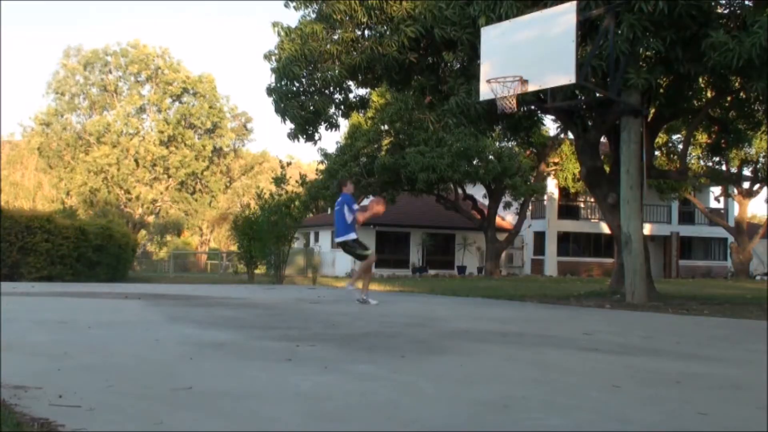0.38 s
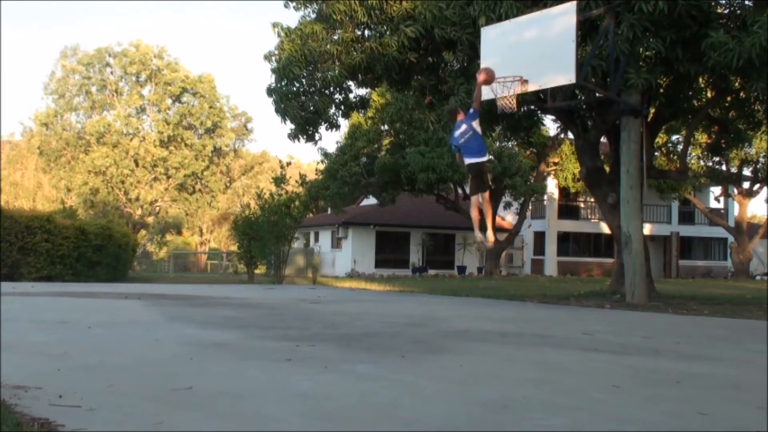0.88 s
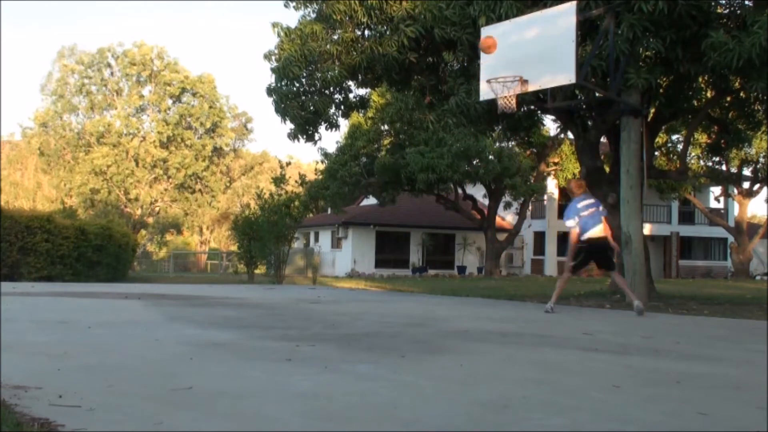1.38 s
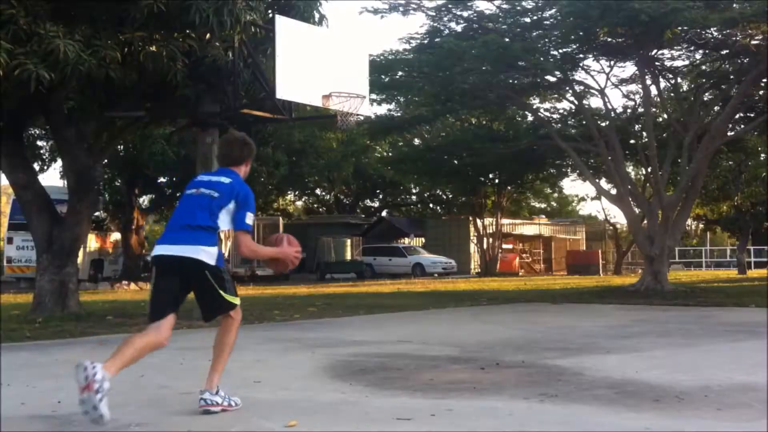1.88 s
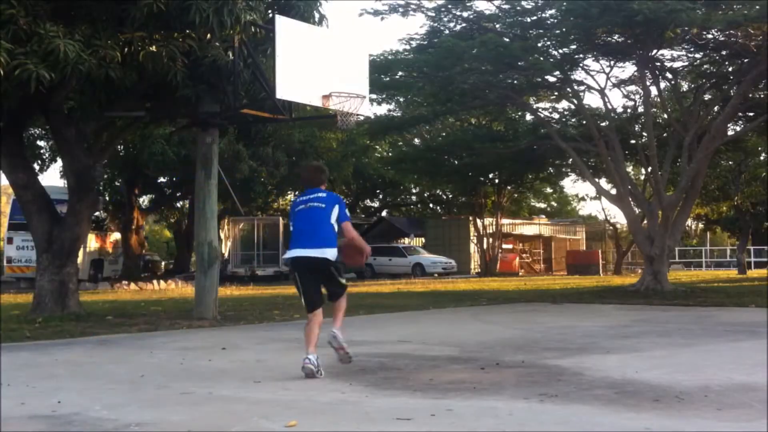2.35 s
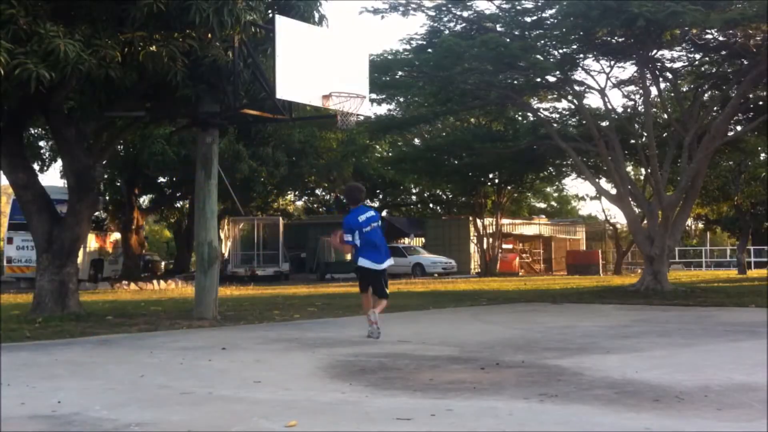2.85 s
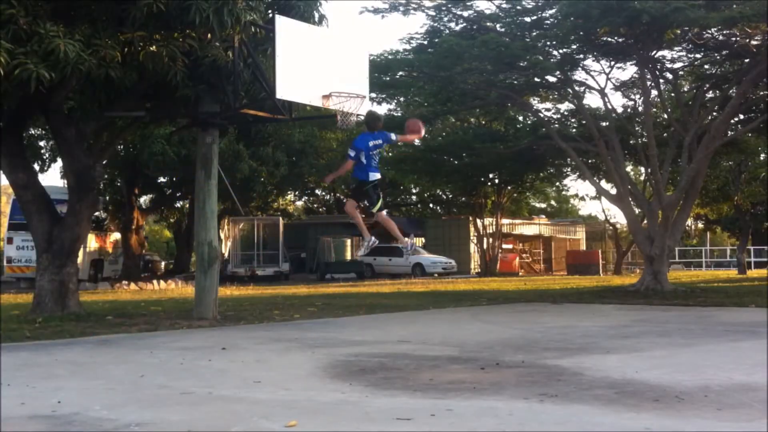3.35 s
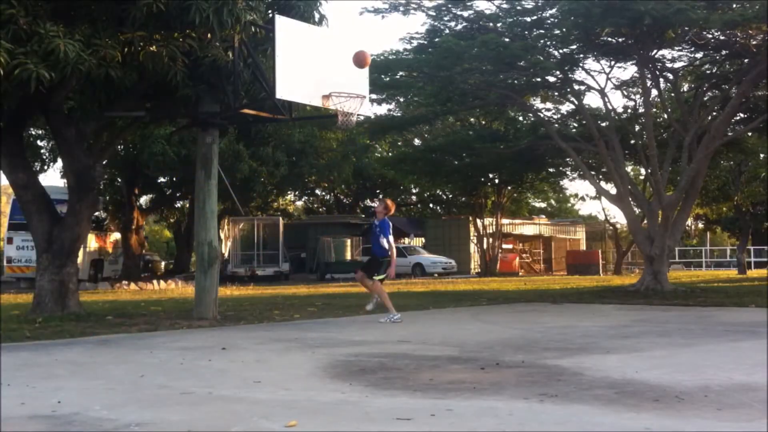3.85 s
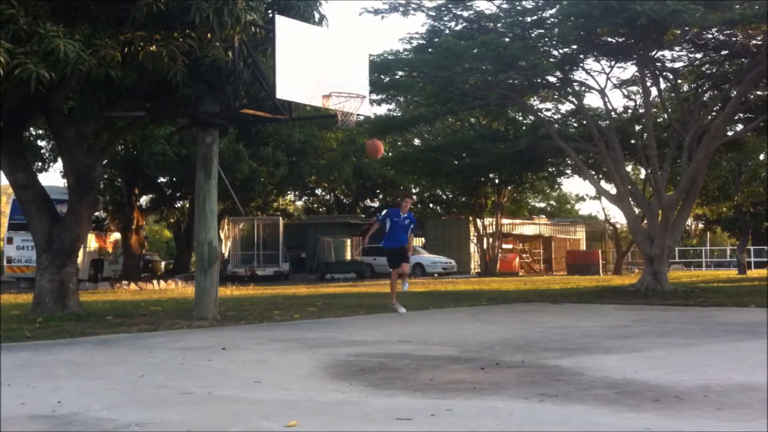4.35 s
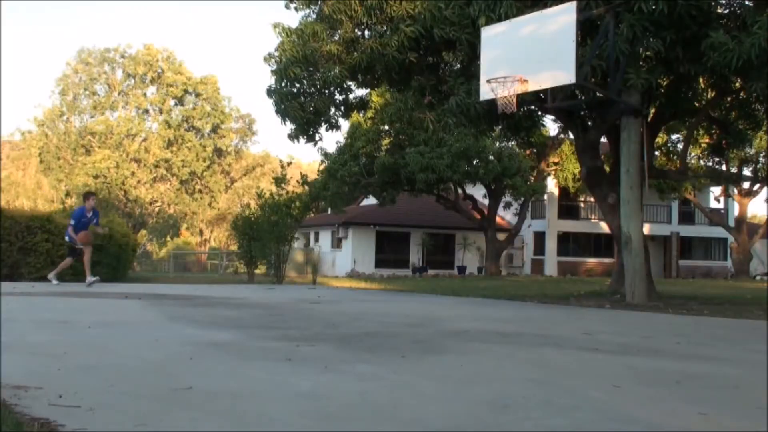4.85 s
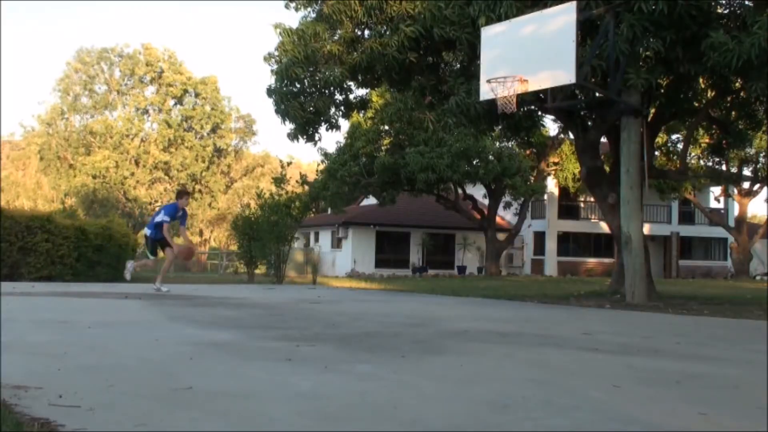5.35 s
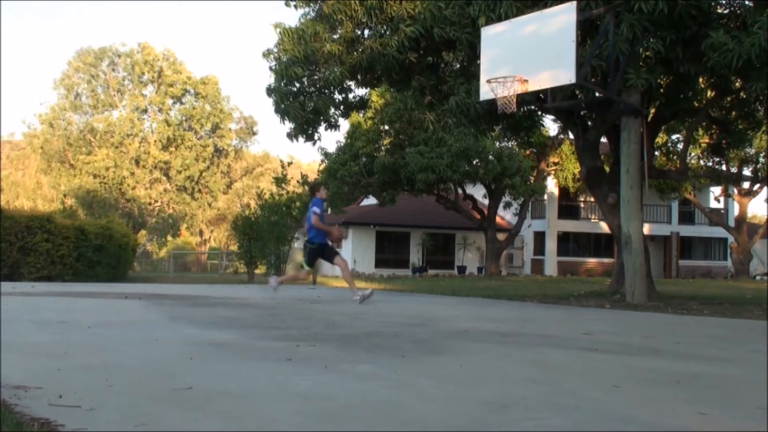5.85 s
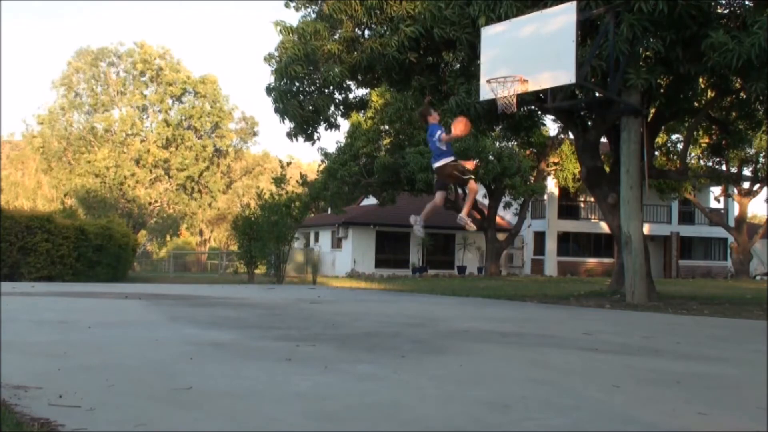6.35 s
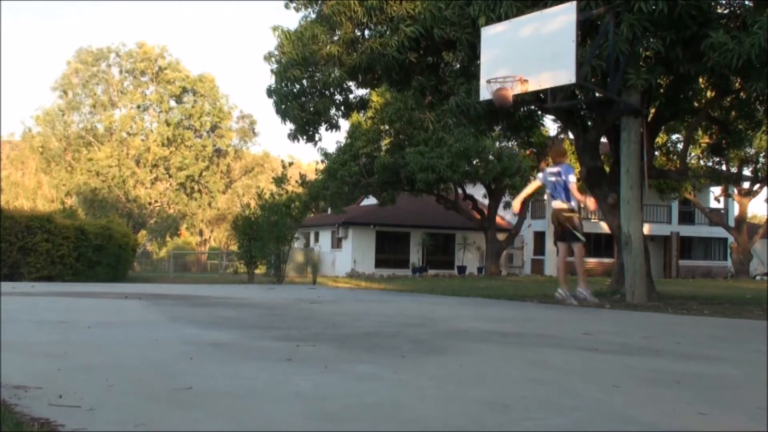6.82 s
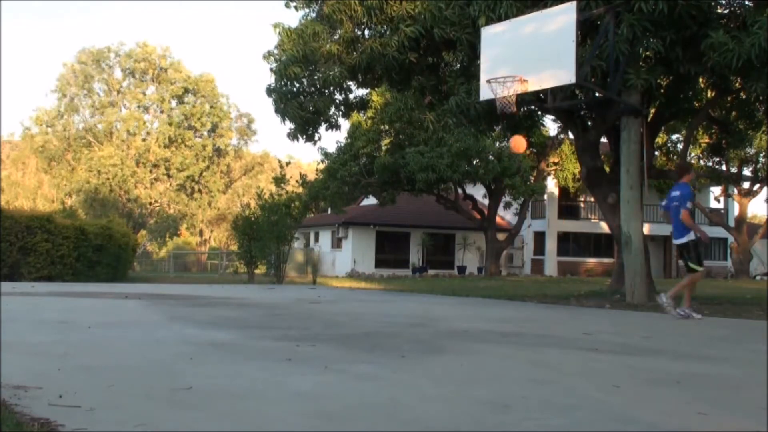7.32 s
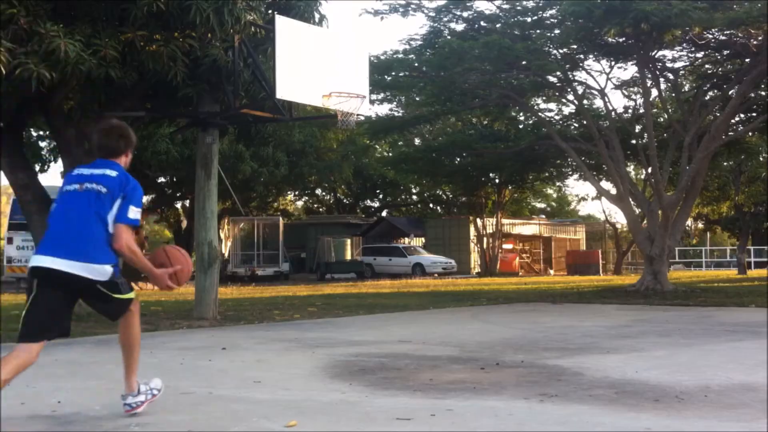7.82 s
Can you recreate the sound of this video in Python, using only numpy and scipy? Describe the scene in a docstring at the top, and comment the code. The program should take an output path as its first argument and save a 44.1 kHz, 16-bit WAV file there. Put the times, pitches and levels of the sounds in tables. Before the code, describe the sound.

Outdoors on a windy court, shoes slap concrete, a basketball smacks down hard, and a loose metal hoop rattles after each of three lay-ups.

```python
"""The rim and backboard rattle after each lay-up, the ball slaps the concrete and shoes slap and scuff.
Takes place on an outdoor court: a far stereo microphone in the wind, a near mono one with a bass cut.
Random touches and knocks ring the hoop's modes; clicks ring the ball; noise puffs make the steps.
Trees and houses return a short diffuse echo, as decaying noise in clumps.
Shaped noise is wind, leaves and distant traffic; gliding sines are faint birds and one bird's echo."""
import sys
import numpy as np
from scipy import signal
from scipy.fft import rfft, irfft, next_fast_len
from scipy.io import wavfile
from scipy.ndimage import uniform_filter1d

SR = 44100
rng = np.random.default_rng(int(sys.argv[2]) if len(sys.argv) > 2 else 0)


def gain_from_db(level_db):
    """Turn a decibel level (scalar or array-like) into a linear amplitude factor."""
    decades = np.asarray(level_db, float) / 20
    return 10 ** decades


def store_pcm(level_fs):
    """Save levels as 16-bit WAV."""
    pcm = np.round(np.clip(level_fs, -1, 1) * 32767).astype(np.int16)
    wavfile.write(sys.argv[1], SR, np.atleast_2d(pcm).T)


N = 361619

# when the near microphone is heard: (start [s], end [s])
NEAR_SPANS = [(1.864, 4.545), (7.57, 8.3)]
# silence at one cut: (start [s], end [s])
SILENT_SPAN = (4.545, 4.578)

# each shot sets the hoop shaking: (ball touch [s], rattle level [dB], treble share [dB],
# board boom level [dB], decay [dB/s], time to spread from the touch [s])
SHOTS = [(1.053, -22, -5, -20.5, 67, .044), (3.691, -20, -7.5, -21.5, 69.5, 0.046),
         (6.679, -22.5, -6.5, -26, 75.5, 0.045)]
# rim knocks against board: (time [s], level [dB], treble share [dB])
KNOCKS = [(1.065, -23.5, 5), (1.077, -16.5, -4), (1.096, -19, 0.5), (1.113, -23, -6), (1.1296, -25.5, 11),
          (1.143, -27, 6), (1.167, -27, 2), (1.199, -26, -0.5), (1.214, -26.5, 3), (1.359, -27, -4.5),
          (1.375, -28, -15), (1.49, -37, -9), (3.701, -30, 4), (3.713, -22, -14), (3.730, -9, -0.5),
          (3.765, -6.5, 2), (3.77, -17.5, 9.5), (3.8068, -16.5, 7.5), (3.885, -26, -17), (3.922, -37, 11.5),
          (4.134, -35.5, -4.5), (6.681, -17, -20), (6.696, -17.5, -18), (6.6995, -25, 11),
          (6.714, -13.5, -5), (6.748, -20.5, 4.5), (6.761, -19.5, -6), (6.792, -16, 0), (6.832, -16.5, -3),
          (6.86, -27.5, 6), (6.872, -32, 6), (6.904, -30.5, 3.5), (6.945, -35, 6),]
# modes of rim and board: (frequency [Hz], level [dB])
HOOP_MODES = [(531, -1.5), (662, -10), (731, -3.5), (855, 2.5), (910, -7.5), (1131, -15.5), (1054, -5),
              (1228, -2), (1486, -6), (1775, -7), (1990, -6.5), (2120, -8.5), (2446, -6), (2544, -6),
              (2705, -4), (2987, -8), (3200, -15), (3330, -9.5), (3850, -18), (5470, -29)]
# low modes of the board: (frequency [Hz], level [dB], t60 [s])
BOARD_BOOM = [(136, -1.5, 0.062), (187, 8, 0.044), (267.8, 2, 0.13)]

# ball on concrete: (time [s], slap level [dB], slap frequency [Hz], ring level [dB], thud frequency [Hz])
BOUNCES = [(2.359, 6, 2150, -16, 192), (5.3763, -10, 4450, -13, 124)]
# air inside the ball: (frequency [Hz], level [dB], t60 [s])
BALL_MODES = [(256, -15.5, 0.06), (349, -4.5, 0.031), (954, -8.5, 0.018), (1170, -2, 0.013),
              (1520, -16, 0.038), (1764, -5, 0.024), (2230, -21, 0.058), (3880, -34, 0.03),
              (4320, -28, 0.022), (5510, -26.5, 0.033)]
# ball meets rim or board: (time [s], low ring level [dB], high ring level [dB])
BALL_TOUCHES = [(1.028, -30, -17.5), (1.067, -28, 0.5), (3.711, -20, -22), (6.643, -20.5, -40),
                (6.681, -12, -6)]
# tilt of the ball's ring above 1200 Hz, dull from afar: {microphone: slope [dB/octave]}
RING_TILT = {"near": 1, "far": -16}
# hard edge above the slap's pitch: {microphone: level [dB]}
SLAP_EDGE_DB = {"near": -8.5, "far": -17}
# wide crack under the pitched slap: {microphone: level [dB]}
SLAP_CRACK_DB = {"near": -22, "far": -20}
# second push as the ball leaves the ground: {microphone: level [dB]}
LIFT_OFF_DB = {"near": 4.5, "far": -4}

# shoes on concrete: (time [s], slap level [dB], heel share [dB], grit share [dB])
STEPS = [(0.114, -33.5, -0.5, -25), (0.345, -36, 2, -5), (0.374, -20.5, -13.5, -19), (0.469, -40.5, -9, -7),
         (0.553, -42.5, -7, -17), (1.289, -32, 6.5, 0.5), (1.454, -26, -4, -9), (1.884, -34, -38, -6.5),
         (1.895, -51, -37, 12.5), (1.98, -42, -31, -7), (1.995, -42.5, -20, 3), (2.022, -49, 4, -3),
         (2.739, -35, -5, -22), (2.946, -61, 22.5, 3), (2.976, -34, -4, -10), (3.005, -25.5, -8.5, -11.5),
         (3.101, -38.5, -33, -7), (3.194, -51, -25, 17), (4.096, -33, -4, -8), (5.038, -39, -26, -46),
         (5.441, -29, -8, -10), (5.512, -33, -4, -8), (5.789, -38, -2, -20), (5.92, -51.5, 5, 12.5),
         (5.97, -39, 2, -11), (5.989, -30, -0.5, -18), (6.016, -17.5, -5, -12.5), (6.109, -32.5, -5, -10),
         (6.976, -21, -14, -7), (6.99, -28, -3, 4), (7.358, -39, -10, -14), (7.367, -44.5, -14, 7.5),
         (7.393, -43, -14, -25)]
# soles drag; the two hisses from 6.022 s on are the bright echo of a hard step:
# (start [s], end [s], level [dB], centre frequency [Hz])
HISSES = [(1.91, 1.964, -49, 9500), (1.979, 2.022, -55, 6000), (2.069, 2.126, -54.5, 3030),
          (2.459, 2.472, -46, 7500), (2.818, 2.87, -53.5, 5000), (2.979, 3.064, -54.5, 3900),
          (5.022, 5.046, -51, 6000), (5.891, 5.892, -38.5, 6000), (6.022, 6.056, -39.5, 4100),
          (6.03, 6.075, -47.5, 10900), (7.766, 7.771, -51.5, 5000), (7.809, 7.841, -55, 4340),
          (8.031, 8.05, -47, 6000)]
# a rubber sole sticks and lets go in dry ticks: (time [s], level [dB])
SLIPS = [(2.087, -42), (2.0978, -41), (2.107, -40), (2.112, -31.5), (2.121, -42), (3.188, -32.5),
         (8.137, -41), (8.15, -40.5)]

# clumps of trunks and walls: (delay [s], level [dB], spread [s])
ECHOES = [(0.036, 14, 0.029), (0.082, 6.5, 0.0067), (.17, -6, .04)]
# bird whistles; the one at 6.067 s is the echo of the whistle before it:
# (start [s], end [s], start frequency [Hz], end frequency [Hz], level [dB])
WHISTLES = [(0.724, 0.91, 2800, 2710, -59), (2.5, 2.625, 2850, 2850, -50.5), (4.93, 4.96, 4750, 5800, -52),
            (5.016, 5.05, 3050, 3100, -48), (5.924, 6.026, 2800, 3300, -37.5),
            (6.067, 6.142, 3050, 3260, -45), (6.252, 6.453, 4150, 4000, -56),
            (7.292, 7.445, 4050, 4040, -55.5), (7.55, 7.68, 2870, 2850, -53.5)]

# breeze at the far microphone: (time [s], level [dB])
BREEZE = [(0, -35), (.45, -42.5), (.56, -51.5), (1.0, -57), (1.7, -76), (1.75, -62), (4.57, -41.5),
          (4.7, -44), (5.03, -52.5), (5.08, -52), (5.3, -43), (5.5, -37), (5.68, -57), (6.0, -43),
          (6.2, -52.5), (6.6, -47), (6.95, -42.5), (7.5, -42), (7.6, -53)]
# buffets on top of it: (time [s], level [dB], hold [s])
BUFFETS = [(0.068, -45, 0.023), (0.213, -53, 0.0041), (0.317, -40.5, 0.0087), (0.747, -52, 0.0049),
           (0.864, -50.5, 0.013), (1.063, -37, 0.3), (1.471, -38.5, 0.0091), (1.62, -41, 0.024),
           (4.616, -55, 0.0096), (5.577, -36.5, 0.0046), (5.728, -34, 0.17), (6.115, -39.5, 0.011),
           (6.252, -40.5, 0.0086), (6.34, -30, 0.0067), (6.421, -36.5, 0.1), (6.702, -28, 0.042)]
# wind spectrum, middle: (frequency [Hz], density [dB per Hz])
WIND_MID = [(15, -1), (30, -3), (60, -1), (110, 1), (200, -6.5), (350, -17), (700, -36), (1500, -74)]
# wind spectrum, left minus right: (frequency [Hz], density [dB per Hz])
WIND_SIDE = [(15, -20), (40, -16), (110, -6), (200, -11), (350, -22), (700, -42), (1500, -81)]

# leaves and distant traffic: (time [s], level [dB])
AIR = [(0, -54), (1, -53.5), (1.85, -57), (1.88, -58), (3.2, -58), (3.6, -60), (4.5, -58), (4.6, -56.5),
       (5.3, -55.5), (5.7, -52.5), (6.6, -52), (7.55, -59), (8.2, -57.5)]
# their spectrum at the far microphone: (frequency [Hz], density [dB per Hz])
FAR_AIR = [(180, -33), (300, -0.5), (660, -4), (1040, -5.5), (2700, -9.5), (3360, -11), (5020, -11),
           (12600, -22), (15700, -24), (16500, -42.5)]
# their spectrum at the near microphone: (frequency [Hz], density [dB per Hz])
NEAR_AIR = [(30, -53), (55, -22), (80, -21.5), (130, -6.5), (200, -6), (370, -18), (520, -18.5),
            (1000, -20), (2740, -23.5), (7000, -28.5), (15200, -38), (16500, -36)]


def hoop():
    """Loose parts chatter while the hoop shakes, the rim knocks on top, and all ring the same modes."""
    rise_db_per_s, hold_s = 217, 0.076
    lag_s = 0.0031   # the fine parts join late
    low, high, boom, knock_low, knock_high = np.zeros((5, N))
    for s, db, treble_db, boom_db, fall, spread_s in SHOTS:
        peak_s = s + spread_s
        low += onset(s) * envelope(peak_s, db, rise_db_per_s, hold_s, fall)
        treble = envelope(peak_s + lag_s, db + treble_db, rise_db_per_s, hold_s - lag_s, fall)
        high += onset(s) ** 2 * treble
        boom += envelope(s + 0.016, boom_db, 900, 0, 53.5)
    for s, db, treble_db in KNOCKS:
        blow = puff(0.0028)
        blow[:6] = 1.7   # metal on board starts with a hard edge
        drier = np.exp(-np.arange(len(blow)) / (0.0051 * SR))
        add(knock_low, s, gain_from_db(db - 2.5) * blow)
        add(knock_high, s, gain_from_db(db + treble_db - 1.5) * blow * drier)
    drive_low = chatter(per_s=450, size_db=-0.5) * low + knock_low
    drive_high = chatter(per_s=500, size_db=7.5) * high + knock_high
    both = drive_low + drive_high

    out = gain_from_db(1.5) * band(drive_high, 2090, 3290)
    out += gain_from_db(-8.5) * band(both, 1700, 4460)
    out += gain_from_db(5.0) * band(drive_low, 400, 1380)
    # the net and the finest contacts hiss, with a thin sizzle on top
    hiss = high * chatter(per_s=780, size_db=4.5) + 0.04 * knock_high
    out += gain_from_db(-5.0) * band(hiss, 2000, 7970)
    out += gain_from_db(-16.5) * band(high * chatter(per_s=250, size_db=1.5), 12000, 13600)
    # the near microphone faces the back of the board, which clacks in the middle range
    out += gain_from_db(2.5) * is_near(np.arange(N) / SR) * band(both, 1520, 2150)

    wander = gain_from_db(2.8 * drift(8.5))   # the loose parts settle in new places, so modes come and go
    for hz, db in HOOP_MODES:
        drive, knock = (drive_low, knock_low) if hz < 1800 else (drive_high, knock_high)
        rattle = 0.72 * np.roll(wander, rng.integers(N)) * (drive - knock)
        # a knock rings the metal more than chatter; each touch feeds each mode with its own strength
        feed = (rattle + gain_from_db(8.5) * knock) * rng.standard_normal(N)
        out += gain_from_db(db - 31) * ring(feed, hz, 0.038)
    return out + board_boom(boom), gain_from_db(-14.5) * board_boom(boom)


def board_boom(strength):
    """The shaken board sounds its few low modes, each driven by its own noise."""
    out = np.zeros(N)
    for hz, db, t60 in BOARD_BOOM:
        out += gain_from_db(db - 34.5) * ring(strength * rng.standard_normal(N), hz, t60)
    return out


def chatter(per_s, size_db):
    """Loose parts touch at random moments; each touch is a tiny scrape, and a few are much harder."""
    touching = rng.random(N) < per_s / SR
    sizes = touching * gain_from_db(size_db * np.minimum(rng.exponential(1, N), 3.0))
    scrape = signal.lfilter([1], [1, -np.exp(-1 / (0.0018 * SR))], sizes)
    return rms_one((scrape + 0.73 * scrape.mean()) * rng.standard_normal(N))


def onset(s):
    """Full gain from s on; a faint lead-in before, as hand and ball brush the rim."""
    early_s = s - np.arange(N) / SR
    brush = gain_from_db(-7.5 - 151 * np.clip(early_s, 0, 1))
    return np.where(early_s > 0, brush, 1)


def ball():
    """A slap, a low push while the ball is squashed, and the air inside rings at landing and lift-off."""
    out = np.zeros(N)
    click = np.eye(1, 20000)[0]
    t = np.arange(len(click)) / SR
    for s, slap_db, slap_hz, ring_db, thud_hz in BOUNCES:
        place = "near" if is_near(s) else "far"
        slap = -ring(ring(click, slap_hz, 0.002), slap_hz, 0.002) / 5.2
        slap -= gain_from_db(SLAP_EDGE_DB[place]) * ring(click, 2.43 * slap_hz, 0.002)
        slap -= gain_from_db(SLAP_CRACK_DB[place]) * band(band(click, 800, 7580), 800, 7600)
        thud = -ring(click, thud_hz, 0.031) * (1 - np.exp(-t / 0.0027))
        lift_off = gain_from_db(LIFT_OFF_DB[place]) * band(np.roll(click, round(0.0103 * SR)), 200, 2000)
        air = np.zeros(len(t))
        for hz, db, t60 in BALL_MODES:
            tilt_db = RING_TILT[place] * max(np.log2(hz / 1200), 0)
            air += gain_from_db(db + tilt_db) * ring(click + lift_off, hz, t60)
        squash = 0.05 * rng.standard_normal(len(t)) * np.exp(-t / 0.008)   # the skin crumples
        air += gain_from_db(17.0) * band(squash, 320, 4500)
        add(out, s, gain_from_db(slap_db) * slap + gain_from_db(ring_db) * air)
        add(out, s + 0.4 / thud_hz, gain_from_db(-3.5) * thud)   # 0.4 cycles late

    low = sum(gain_from_db(db) * ring(click, hz, 1.26 * t60) for hz, db, t60 in BALL_MODES[2:4])
    low = low * (1 - np.exp(-t / 0.0015))   # a soft contact
    high = sum(gain_from_db(db) * ring(click, hz, t60) for hz, db, t60 in BALL_MODES[-3:])
    for s, low_db, high_db in BALL_TOUCHES:
        add(out, s, gain_from_db(low_db) * low + gain_from_db(high_db) * high)
    return out


def shoes():
    """Each footfall is a puff heard as heel, sole and grit; dragged soles and a step's echo are grainy hiss."""
    heel, sole, grit, hisses, slips = np.zeros((5, N))
    for s, db, heel_db, grit_db in STEPS:
        add(sole, s, gain_from_db(db - 3.5) * puff(0.0026))
        add(sole, s, gain_from_db(db) * np.ones(3))   # the edge of the sole snaps down
        add(heel, s, gain_from_db(db + heel_db) * puff(0.01))   # the heel lands softer and longer
        add(grit, s, gain_from_db(db + grit_db) * puff(0.00072))
    for start, end, db, hz in HISSES:
        count = max(round((end - start) * SR), 50)
        grains = rng.standard_normal(count) * gain_from_db(3.0 * rng.standard_normal(count))
        hiss = rms_one(band(grains, hz / 1.9, hz * 1.37))
        add(hisses, start, gain_from_db(db) * hiss * np.hanning(count) ** 0.57)
    for s, db in SLIPS:
        add(slips, s, gain_from_db(db) * np.array([-1, 0, 1, 1]))
    out = gain_from_db(8.0) * band(sole, 490, 2750)
    out += gain_from_db(16.5) * band(heel, 82, 520)
    out += gain_from_db(8.5) * band(grit, 2600, 8400)
    return out + hisses + ring(slips, hz=3300, t60=0.0043) + 0.85 * slips


def surroundings(x, dull_hz):
    """Trunks and walls scatter the sound back in clumps over a faint dying tail."""
    t = np.arange(SR) / SR
    clumps = sum(gain_from_db(db) * np.exp(-((t - delay) / spread) ** 2) for delay, db, spread in ECHOES)
    tail = gain_from_db(5.5 - 60 * t / 1.35) * (1 - np.exp(-t / 0.0066))
    grains = rng.standard_normal(SR) * gain_from_db(3.1 * rng.standard_normal(SR))
    return echo(x, band(grains, 143, dull_hz) * (clumps + tail))


def foliage(x, delay_s, spread_s):
    """The leaves of the trees scatter the treble back in a short bright smear."""
    t = np.arange(4000) / SR
    smear = np.exp(-((t - delay_s) / spread_s) ** 2)
    return echo(x, band(rng.standard_normal(len(t)), 1700, 15600) * smear)


def birds():
    """Whistles and one whistle's echo: near sines that glide fast, then settle, with a slight flutter."""
    out = np.zeros(N)
    flutter = gain_from_db(1.1 * drift(25) + 2.3 * drift(150))
    for start, end, start_hz, end_hz, db in WHISTLES:
        u = np.linspace(0, 1, round((end - start) * SR))
        hz = end_hz + (start_hz - end_hz) * np.exp(-4.5 * u)
        swell = np.sin(np.pi * u ** 0.94) ** 0.28
        add(out, start, gain_from_db(db - 10.0) * np.sin(2 * np.pi * np.cumsum(hz) / SR) * swell)
    return out * flutter


def wind():
    """Turbulence on the two ports follows the gusts, brighter in strong ones, left and right partly unrelated."""
    gust = gain_from_db(in_time(BREEZE))
    for s, db, hold_s in BUFFETS:
        gust = gust + envelope(s, db, 285, hold_s, 212)
    gust = gust * gain_from_db(1.94 * drift(25.0))   # eddies make it lumpy
    mid = coloured(rng.standard_normal(N), WIND_MID)
    side = coloured(rng.standard_normal(N), WIND_SIDE)
    swell = np.sqrt(uniform_filter1d(mid ** 2, size=3000))   # dividing by it leaves loudness to the gusts
    flutter = gain_from_db(-26.5 + 4.1 * drift(8.7)) * (gust / gain_from_db(-41.0)) ** 0.5
    flap_mid, flap_side = flutter * band(rng.standard_normal((2, N)), 106, 754) * gain_from_db(15.0)
    return gust * (mid / swell + flap_mid), gust * (side / mid.std() + flap_side)


def leaves_and_traffic(spectrum):
    """Countless leaves and distant traffic blend into steady noise of one spectrum, rms 1."""
    return rms_one(coloured(rng.standard_normal(N), spectrum))


def is_near(t):
    """Whether the near microphone is heard at time t."""
    return sum((t >= start) & (t < end) for start, end in NEAR_SPANS) > 0


def envelope(s, db, rise_db_per_s, hold_s, fall_db_per_s):
    """Gain that climbs to db at s, holds, then dies away."""
    t = np.arange(N) / SR - s
    rise_db = rise_db_per_s * np.clip(-t, 0, 1)
    fall_db = fall_db_per_s * np.clip(t - hold_s, 0, 2)
    return gain_from_db(db - rise_db - fall_db)


def puff(length_s):
    """A click that crumbles into dying noise."""
    t = np.arange(4000) / SR
    noise = rng.standard_normal(len(t))
    noise[:3] = 0.7
    return noise * np.exp(-t / length_s)


def ring(clicks, hz, t60):
    """A two-pole resonator: a unit click sets a dying sine of height 1 ringing."""
    r = gain_from_db(-60 / (t60 * SR))
    w = 2 * np.pi * hz / SR
    return signal.lfilter([0, np.sin(w)], [1, -2 * r * np.cos(w), r * r], clicks + 1e-18)


def echo(x, answer):
    """Convolves x with an answer scaled to unit energy."""
    return signal.fftconvolve(x, answer / np.sqrt(np.sum(answer ** 2)))[:N]


def add(out, s, sound):
    """Places a sound into out at s seconds."""
    at = round(s * SR)
    out[at:at + len(sound)] += sound[:N - at]


def band(x, low_hz, high_hz):
    """Keeps the range between two frequencies."""
    return signal.sosfilt(signal.butter(2, [low_hz, high_hz], "band", fs=SR, output="sos"), x)


def coloured(x, spectrum):
    """Shapes x by a spectrum drawn on a log frequency axis."""
    size = next_fast_len(N)
    hz, db = np.transpose(spectrum)
    bins_hz = np.fft.rfftfreq(size, 1 / SR)
    gain = gain_from_db(np.interp(np.log(bins_hz + 1), np.log(hz), db))
    return irfft(rfft(x, size) * gain, size)[:N]


def drift(rate_hz):
    """Random wandering below rate_hz, rms 1."""
    low_pass = signal.butter(2, rate_hz, fs=SR, output="sos")
    return rms_one(signal.sosfilt(low_pass, rng.standard_normal(N + SR))[SR:])


def in_time(rows):
    """A level curve at every sample; silence outside it."""
    s, db = np.transpose(rows)
    return np.interp(np.arange(N) / SR, s, db, left=-200, right=-200)


def rms_one(x):
    """Scales x to rms 1."""
    return x / np.sqrt(np.mean(x ** 2) + 1e-20)


def scene():
    """Mid and side of the far microphone, mid alone of the near one, switched at the cuts."""
    t = np.arange(N) / SR
    rattle, rattle_side = hoop()
    court = rattle + ball() + shoes()
    heard = court + birds() + gain_from_db(-21.5) * surroundings(court, dull_hz=6000)
    air = gain_from_db(in_time(AIR) + 0.6 * drift(3))
    wind_mid, wind_side = wind()

    far_mid = heard + gain_from_db(-13.0) * foliage(court, delay_s=0.027, spread_s=0.013)
    far_mid += wind_mid + air * leaves_and_traffic(FAR_AIR)
    far_side = wind_side + 0.0093 * wind_mid + rattle_side
    far_side += gain_from_db(-27.5) * surroundings(court, dull_hz=5000)
    far_side += gain_from_db(-10.0) * air * band(leaves_and_traffic(FAR_AIR), 150, 15000)

    bass_cut = signal.butter(3, 115, "high", fs=SR, output="sos")
    near_mid = heard + gain_from_db(-27.5) * foliage(court, delay_s=0.028, spread_s=0.012)
    near_mid = signal.sosfilt(bass_cut, near_mid)
    near_mid += gain_from_db(2.0) * air * leaves_and_traffic(NEAR_AIR)

    near = is_near(t)
    mid = np.where(near, near_mid, far_mid)
    side = np.where(near, 0, far_side)
    sounding = (t < SILENT_SPAN[0]) | (t >= SILENT_SPAN[1])
    return np.array([mid + side, mid - side]) * sounding


def band_limit(x):
    """A steep low-pass at the top of the band."""
    return signal.sosfilt(signal.butter(12, 16830, fs=SR, output="sos"), x)


def record(dry):
    """The top is cut and peaks are rounded near full scale."""
    top_cut = signal.cheby2(10, 50, 16500, fs=SR, output="sos")
    ceiling = 1.3
    mix = ceiling * np.tanh(signal.sosfilt(top_cut, dry) / ceiling)
    return band_limit(mix)


dry = scene()
out = record(dry)
store_pcm(out)
```